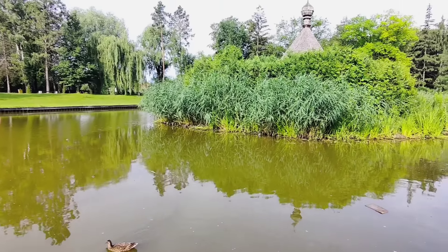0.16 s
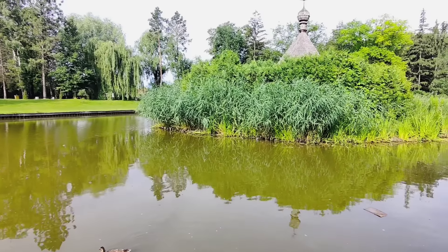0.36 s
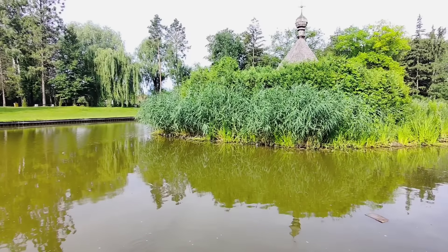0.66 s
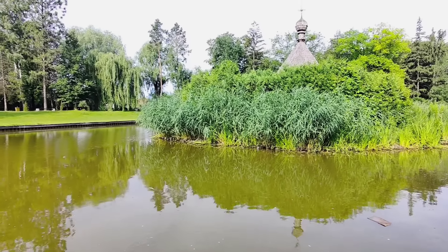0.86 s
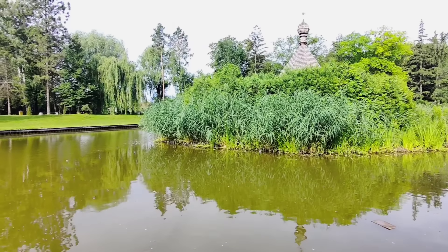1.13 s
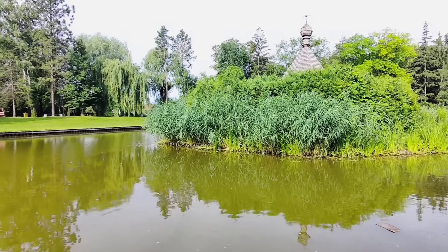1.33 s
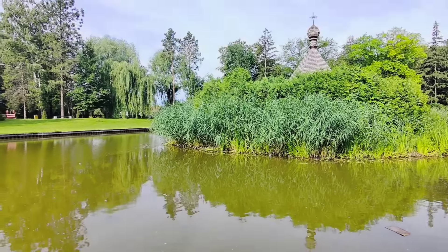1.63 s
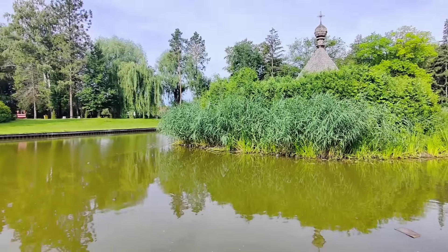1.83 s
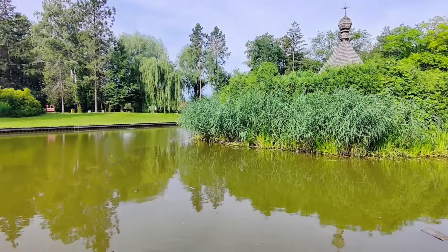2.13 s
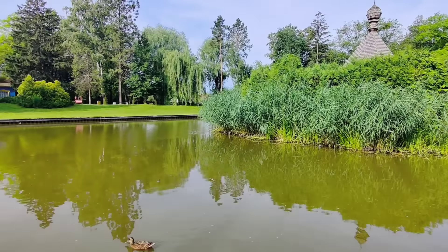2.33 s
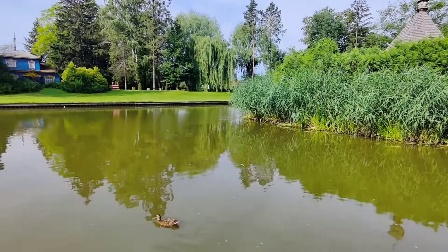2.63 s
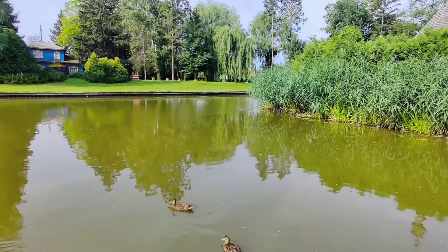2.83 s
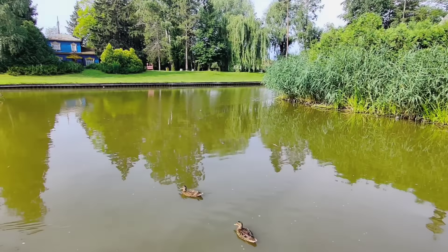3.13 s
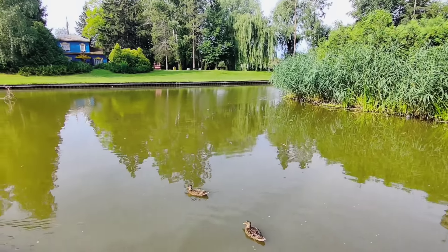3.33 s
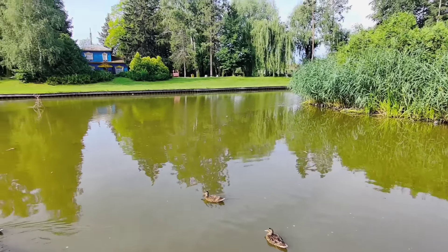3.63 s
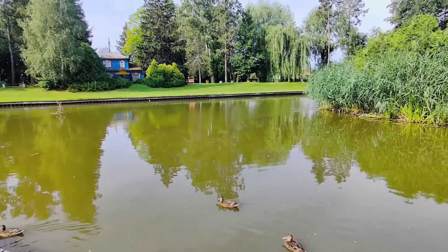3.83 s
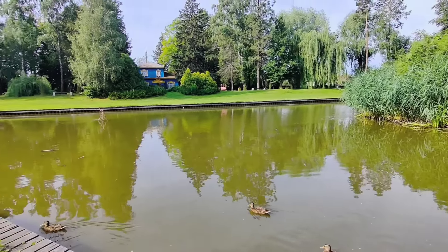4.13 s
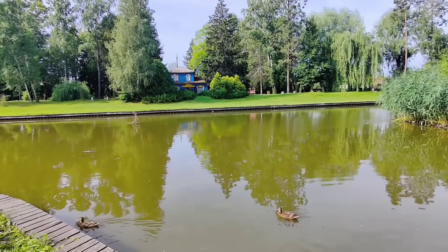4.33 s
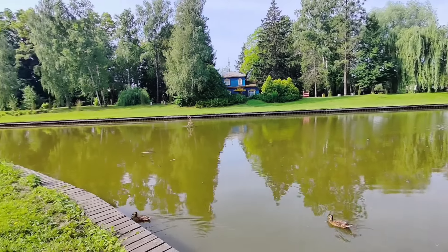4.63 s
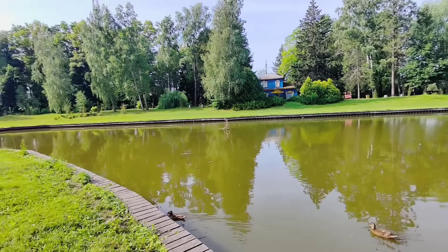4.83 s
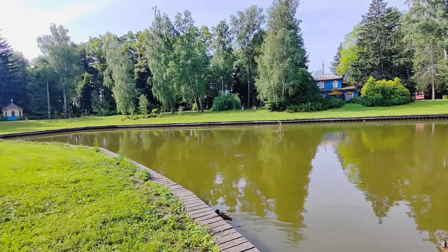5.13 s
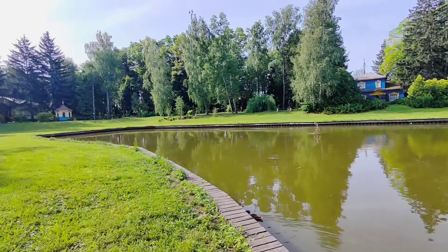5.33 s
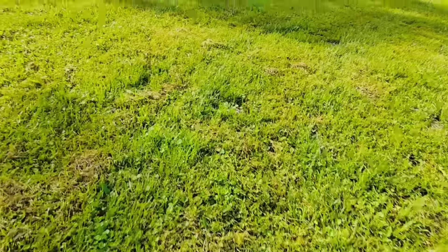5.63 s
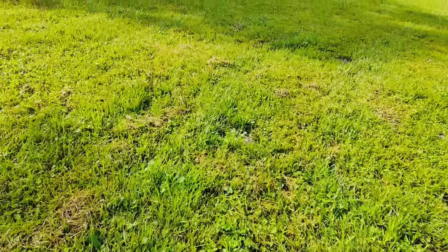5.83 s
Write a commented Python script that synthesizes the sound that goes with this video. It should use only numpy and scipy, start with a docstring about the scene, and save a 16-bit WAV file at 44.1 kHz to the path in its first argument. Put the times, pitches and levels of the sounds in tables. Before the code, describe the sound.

Low wind rumbles on the microphone by a calm pond, with steady cricket chirps, faint birds and small handling ticks.

```python
"""Wind rumbles on the ports of a small hand-held microphone pair beside a calm park pond.
A far machine hums, and noise bands make distant traffic and hissing leaves. Crickets chirp on the right,
each wing stroke a sagging tone; near the end one is suddenly close. Small birds whistle and chip, echoed
by the trees, and a duck quacks once. Grass swishes, and the grip ticks, knocks and bumps now and then."""
import sys
import numpy as np
from scipy import signal
from scipy.fft import rfft, irfft, next_fast_len
from scipy.io import wavfile

SR = 44100
rng = np.random.default_rng(int(sys.argv[2]) if len(sys.argv) > 2 else 0)


def store_pcm(level_fs):
    """Save levels as 16-bit WAV."""
    pcm = np.round(np.clip(level_fs, -1, 1) * 32767).astype(np.int16)
    wavfile.write(sys.argv[1], SR, np.atleast_2d(pcm).T)


N = 263012
TIME = np.arange(N) / SR


def from_db(db):
    """Decibels to gain."""
    return 10 ** (np.asarray(db) / 20)

def rms_one(x):
    """Scale to unit rms."""
    return x / np.sqrt(np.mean(x ** 2) + 1e-20)

def in_time(rows):
    """Turn breakpoint rows into one automation curve per column."""
    time_s, *columns = np.transpose(rows)
    return [np.interp(TIME, time_s, column) for column in columns]

def at_hz(points, hz):
    """Read an EQ curve on a log-frequency axis."""
    freq_hz, gain_db = np.transpose(points)
    return np.interp(np.log(hz), np.log(freq_hz), gain_db)

def phase_of(hz):
    """Running phase of a moving pitch."""
    return 2 * np.pi * np.cumsum(hz) / SR

def panned(x, pan_db):
    """Mono to stereo; pan_db is always left minus right."""
    return np.array([x * from_db(pan_db / 2), x * from_db(-pan_db / 2)])

def drift(rate_hz):
    """Smooth random modulation with a spread of 1."""
    hop, settle = 40, 2000
    pole = np.exp(-2 * np.pi * rate_hz * hop / SR)
    noise = rng.standard_normal(N // hop + settle + 2)
    slow = signal.lfilter([1], [1, -2 * pole, pole * pole], noise)[settle:]
    return np.interp(np.arange(N) / hop, np.arange(len(slow)), rms_one(slow))

def band(x, low_hz, high_hz):
    """Gentle band-pass."""
    return signal.sosfilt(signal.butter(2, [low_hz, high_hz], "band", fs=SR, output="sos"), x)

def steep_band(x, low_hz, high_hz):
    """Band-pass twice for steeper skirts."""
    return band(band(x, low_hz, high_hz), low_hz, high_hz)

def coloured(spectrum):
    """Stereo noise through an EQ curve, at unit rms."""
    size = next_fast_len(N)
    hz = np.maximum(np.fft.rfftfreq(size, 1 / SR), 1)
    white = rfft(rng.standard_normal((2, N)), size)
    return rms_one(irfft(white * from_db(at_hz(spectrum, hz)), size)[:, :N])

def placed(start_s, piece):
    """A stereo track holding one piece; what overhangs either end is trimmed."""
    out, i = np.zeros((2, N)), int(start_s * SR)
    piece = piece[:, max(-i, 0):N - i]
    out[:, max(i, 0):max(i, 0) + piece.shape[1]] = piece
    return out


# Gust automation: time_s, rumble_db, buffet_relative_db, flutter_relative_db, pan_db
GUSTS = [(0.0, -25.5, -23, -18, -9), (0.06, -29, -8, -26, 7), (0.18, -25.5, -4.5, -22.5, 1),
         (0.66, -39, -9.5, -29, 12), (0.75, -26.5, -7, -14.5, 13), (0.8, -35.5, -41, -52, 9.5),
         (0.94, -33, -6, -16, -11.5), (1.03, -35, -7, -26, 4.5), (1.3, -40, -14, -34, 0),
         (1.5, -35, -12.5, -28, 7), (1.8, -43.5, -11, -27, 0.5), (2.0, -48, -5.5, -28, 3.5),
         (2.2, -53.5, -10, -21, 3), (2.54, -55, -13, -23, -2.5), (3.07, -39.5, -29, -30, 21),
         (3.27, -46, -16, -21, 5.5), (3.7, -45, -17.5, -26, 4), (4.05, -41, -19, -31, 9),
         (4.38, -39, -16, -39, 7.5), (4.6, -39.5, -29, -39, 13), (4.76, -39.5, -36, -31, -1.5),
         (4.8, -52.5, 0, -17, 0), (5.06, -42.5, -41, -32, 9.5), (5.46, -35, -27, -41, -4),
         (5.68, -48, -7.5, -17.5, -1), (5.79, -39.5, 1, -6, -21), (5.93, -33, -4, -25, -18),
         (5.96, -45.5, 14, 14.5, -14)]
# Rumble EQ: freq_hz, gain_db
RUMBLE_EQ = [(7.1, -44), (12, 6), (33, 5.5), (45, 0), (60, -2.5), (78, -52), (130, -120)]

def wind(lumps_db=4, lumps_hz=14):
    """Wind hits each port with its own lumpy rumble, with buffeting and flutter on top."""
    rumble_db, buffet_db, flutter_db, pan_db = in_time(GUSTS)
    lumps = np.array([from_db(lumps_db * drift(lumps_hz)) for side in "LR"])
    rumble = rms_one(coloured(RUMBLE_EQ) * lumps)
    buffet = rms_one(steep_band(rng.standard_normal((2, N)), 44.8, 104.3) * lumps)
    flutter = rms_one(steep_band(rng.standard_normal((2, N)), 81, 179) * lumps)
    blend = rumble + from_db(buffet_db) * buffet + from_db(flutter_db) * flutter
    return blend * panned(from_db(rumble_db), pan_db)


# Machine drone: time_s, pitch_hz, level_db
MACHINE_HUM = [(0, 101.3, -57.5), (2, 100.1, -66.5), (3, 100.2, -60), (4.5, 100.8, -57.5),
               (5.96, 99.6, -62.5)]

def machine_hum():
    """A far machine holds one low tone that wavers in pitch and level."""
    pitch_hz, level_db = in_time(MACHINE_HUM)
    tone = np.sqrt(2) * np.sin(phase_of(pitch_hz + 4.5 * drift(5.7)))
    return panned(tone * from_db(level_db + 3 * drift(8)), 0.13)


# Stereo width of the ambience: freq_hz, side_minus_mid_db
BED_WIDTH = [(60, -35), (180, -23), (550, -5), (1650, 0.5), (4970, 1), (15000, -5)]
# Lean of the ambience: freq_hz, pan_db
BED_PAN = [(60, -11.5), (180, 1), (550, 0.5), (1650, -4), (4970, -5), (15000, -1)]

def ambience_bed(spectrum, flicker_db):
    """Seven overlapping noise bands flicker partly together, each with its own width and pan."""
    size = next_fast_len(N)
    noise = rfft(coloured(spectrum), size)
    out, shared_flicker = 0, drift(9.5)
    centres_hz = np.geomspace(spectrum[0][0], spectrum[-1][0], 7)
    bin_hz = np.fft.rfftfreq(size, 1 / SR) + 1
    band_position = np.interp(np.log(bin_hz), np.log(centres_hz), np.arange(7))
    for k, hz in enumerate(centres_hz):
        crossfade = np.clip(1 - np.abs(band_position - k), 0, 1)
        flicker = from_db(flicker_db * (shared_flicker + drift(11.4)))
        mid, side = irfft(noise * crossfade, size)[:, :N] * flicker
        side *= from_db(at_hz(BED_WIDTH, hz))
        out += np.array([mid + side, mid - side]) * panned(np.ones(1), at_hz(BED_PAN, hz))
    return out / np.std(out.mean(0))


# Ambience faders: time_s, traffic_db, leaves_db, hiss_db
AIR_FADERS = [(0, -60, -64.5, -72), (.4, -60, -66, -76.5), (.8, -59.5, -64.5, -74), (1.25, -63, -65.5, -73),
              (1.5, -58, -64.5, -74.5), (2.1, -59.5, -66.5, -75.5), (2.28, -66.5, -68.5, -78.5),
              (2.72, -66, -71, -81), (3.0, -57, -67, -72.5), (3.4, -64, -69, -75.5),
              (4.0, -57.5, -66.5, -75), (4.5, -59, -63.5, -70.5), (4.85, -62, -67.5, -77),
              (5.45, -59.5, -64, -73), (5.7, -61, -66.5, -73.5), (5.96, -63.5, -70, -77)]
# EQ of each layer: freq_hz, gain_db
TRAFFIC_EQ = [(59, -27.5), (100, 0), (146, -10.5), (282, -16), (428, -13.5), (524, -16.5), (616, -17),
              (1350, -24.5), (2500, -24), (3250, -32), (5500, -120)]
LEAVES_EQ = [(1000, -54), (1400, -12), (2200, -8), (3300, -2), (4400, 0), (5000, -6.5), (5900, -3),
             (6800, -9), (8000, -19), (9500, -92)]
HISS_EQ = [(5000, -34), (7500, -2), (10000, 0), (14200, -1.5), (15200, -3), (15800, -21)]

def park_air():
    """Far traffic below, leaves above, a fine hiss on top."""
    traffic_db, leaves_db, hiss_db = in_time(AIR_FADERS)
    traffic = from_db(traffic_db) * ambience_bed(TRAFFIC_EQ, flicker_db=.9)
    leaves = from_db(leaves_db) * ambience_bed(LEAVES_EQ, flicker_db=.5)
    hiss = coloured(HISS_EQ) * from_db(hiss_db + 1.3 * drift(8))
    return traffic + leaves + hiss


# Far cricket fader: time_s, level_db
CHORUS_FADER = [(0, -78), (.4, -72), (.9, -74), (1.6, -66.5), (2.2, -78), (2.5, -79), (2.8, -68),
                (3.2, -70.5), (3.45, -71.5), (3.75, -69), (4.3, -71), (4.8, -74), (5.23, -71), (5.7, -81),
                (5.96, -68)]

def cricket_chorus():
    """Far crickets blur into one narrow, throbbing band."""
    blur = steep_band(rng.standard_normal(N), 4240, 4570)
    throb = 1 + .19 * np.sin(phase_of(29 + 2.62 * drift(2.4)))
    chorus = rms_one(blur * throb * from_db(3.5 * drift(3.8)))
    return panned(chorus * from_db(in_time(CHORUS_FADER)[0]), -6.5)


# Cricket chirps, about three a second: last_stroke_s, level_db, pitch_hz, pan_db
CRICKET_CHIRPS = [(.044, -57.5, 4400, -13), (.213, -76, 4420, -10), (0.367, -57, 4450, -12),
                  (.703, -59.5, 4430, -11), (1.035, -58, 4430, -12), (1.351, -57, 4430, -9),
                  (1.668, -64, 4420, -15), (2.002, -59, 4430, -9), (2.323, -64.5, 4430, -9),
                  (2.62, -72, 4410, -8), (3.072, -62, 4450, -10), (3.33, -67, 4450, -16),
                  (3.731, -63, 4360, -15), (4.035, -71, 4480, -10), (4.408, -62, 4440, -8),
                  (4.719, -60, 4440, -16), (5.001, -78, 4420, -4), (5.683, -63.5, 4420, -11),
                  (5.872, -36.5, 4444, -6)]
# The four wing strokes of a chirp: offset_s, length_s, relative_db, flat_by_hz
WING_STROKES = [(-.09, .015, -8, 66), (-.066, .021, -2.5, 73), (-.035, 0.024, -0.5, 50),
                (-.001, 0.028, 0, -5)]

def crickets(scatter_db=1.5):
    """Each wing stroke is a near-pure tone that sags in pitch as the wing's file slows."""
    out = np.zeros((2, N))
    for last_stroke_s, level_db, pitch_hz, pan_db in CRICKET_CHIRPS:
        for offset_s, length_s, relative_db, flat_by_hz in WING_STROKES:
            progress = np.linspace(0, 1, int(length_s * SR))
            phase = phase_of((pitch_hz - flat_by_hz) * (1.02 - .09 * progress ** 3))
            tone = np.sin(phase) + from_db(-34) * np.sin(2 * phase)
            envelope = np.sin(np.pi * progress ** 1.3) ** .7
            gain = from_db(level_db + relative_db + scatter_db * rng.standard_normal())
            out += placed(last_stroke_s + offset_s, panned(tone * envelope * gain, pan_db))
    return out


def whistled_note(times_s, pitches_hz, levels_db, pan_db, waver):
    """A bird's pure tone follows breakpoints, trembling in pitch and level."""
    start_s, end_s = times_s[0], times_s[-1]
    t = np.arange(start_s, end_s, 1 / SR)
    tremble = waver[int(start_s * SR):][:len(t)]
    fade = np.clip(np.minimum(t - start_s, end_s - t) / .008, 0, 1)
    tone = np.sqrt(2) * np.sin(phase_of(np.interp(t, times_s, pitches_hz) * (1 + .004 * tremble)))
    gain = from_db(np.interp(t, times_s, levels_db) + 1.5 * tremble[::-1])
    return placed(start_s, panned(tone * fade * gain, pan_db))


# High whistles: shape_name, start_s, length_s, start_hz, level_db, pan_db, send_db
HIGH_WHISTLES = [("sag", .09, 0.152, 6040, -56.5, -7.5, 2), ("sag", 5.59, 0.086, 5990, -65.5, 2.5, 4)]
# Whistle contours by name: length_fraction, pitch_ratio, relative_db
WHISTLE_SHAPES = {"sag": [(0, 1.0, -9), (.12, .999, 1.5), (.23, .995, .5), (.265, .958, -2.5),
                  (.56, .936, .5), (.89, .931, -1.5), (1, .929, -11)]}

def bird_whistles(waver):
    """Thin whistles that sag in pitch; yields each note with its echo send."""
    for shape_name, start_s, length_s, start_hz, level_db, pan_db, send_db in HIGH_WHISTLES:
        fraction, ratio, relative_db = np.transpose(WHISTLE_SHAPES[shape_name])
        times_s = start_s + fraction * length_s
        yield whistled_note(times_s, start_hz * ratio, level_db + relative_db, pan_db, waver), send_db


# Short bird chirps: start_s, length_s, start_hz, end_hz, level_db, pan_db
SLIDING_CHIRPS = [(0.239, 0.019, 3600, 3700, -68, -11), (.3, .047, 5050, 4850, -68, -2),
                  (0.534, 0.042, 4340, 4334, -49.5, -11), (1.951, 0.018, 2290, 2350, -62.5, -12),
                  (2.24, .028, 3620, 3920, -66, -5), (2.592, 0.016, 5650, 5570, -57, -1),
                  (3.216, .07, 7230, 5970, -73, -5), (3.928, 0.063, 7400, 6340, -74, -12),
                  (4.067, .04, 7300, 6270, -73, -11), (4.95, .07, 6500, 5570, -78, -5),
                  (3.87, 0.03, 2830, 2840, -69, -8), (4.307, 0.035, 2740, 2740, -67, -11),
                  (4.385, .02, 2740, 2670, -67, -9), (4.405, 0.023, 2760, 2660, -66, -9),
                  (4.438, 0.017, 2740, 2640, -77, -5), (4.434, 0.039, 2520, 2310, -63, -9),
                  (5.097, 0.038, 3470, 3390, -60, -8), (5.18, 0.052, 4414, 4400, -58, -4),
                  (5.355, 0.07, 3440, 3460, -69, 1), (5.453, 0.057, 4326, 4330, -56.5, -7),
                  (0.578, 0.043, 4390, 4300, -65, -14), (5.248, 0.129, 4460, 4410, -67, -6),
                  (5.509, 0.11, 4315, 4300, -68, -7)]

def bird_chirps(waver, waver_hz=20, waver_db=2.5):
    """Each chirp is a brief, trembling slide between two pitches."""
    out = np.zeros((2, N))
    for start_s, length_s, start_hz, end_hz, level_db, pan_db in SLIDING_CHIRPS:
        progress = np.linspace(0, 1, int(length_s * SR))
        tremble = waver[int(start_s * SR):][:len(progress)]
        pitch_hz = start_hz + (end_hz - start_hz) * progress + waver_hz * tremble
        tone = np.sqrt(2) * np.sin(phase_of(pitch_hz))
        envelope = np.sin(np.pi * progress ** 1.1) ** .54
        gain = from_db(level_db + waver_db * tremble[::-1])
        out += placed(start_s, panned(tone * envelope * gain, pan_db))
    return out


# Soft handling knocks: start_s, level_db, pitch_hz, pan_db
GRIP_KNOCKS = [(0.245, -52.5, 286, 8), (1.757, -47, 425, -3), (2.905, -48.5, 370, 2),
               (3.988, -49.5, 375.3, 5), (4.332, -54, 262, 6), (4.754, -50, 440, 2), (4.898, -56, 437, -1),
               (5.021, -57, 460, 1.5), (5.702, -42, 485, 6)]

def grip_knocks():
    """A knock on the grip is a damped ring with a puff of midrange noise."""
    out, t = np.zeros((2, N)), TIME[:SR // 20]
    for start_s, level_db, pitch_hz, pan_db in GRIP_KNOCKS:
        ring = np.sin(2 * np.pi * pitch_hz * t) * np.exp(-t / .0056)
        puff = .99 * band(rng.standard_normal(len(t)), 290, 1800) * np.exp(-t / .0088)
        out += placed(start_s, panned((ring + puff) * from_db(level_db), pan_db))
    return out


# A run of falling chirps: start_s, length_s, start_hz, level_db, pan_db
FALLING_CHIRPS = [(.278, .068, 4350, -63, 1), (.39, .07, 4350, -62, 2), (.503, .06, 4350, -62.5, 1),
                  (.607, .06, 4350, -65, 2), (.73, .06, 3800, -63.5, 1)]
# Their pitch contour: length_fraction, drop_fraction
FALL_CONTOUR = [(0, 0), (.12, .08), (.36, .57), (.72, .74), (1, 1)]

def bird_falls(waver, end_hz=2950, waver_db=2.5):
    """A bird's chirps drop in two steps to the same pitch, fading as they fall."""
    out = np.zeros((2, N))
    for start_s, length_s, start_hz, level_db, pan_db in FALLING_CHIRPS:
        progress = np.linspace(0, 1, int(length_s * SR))
        tremble = waver[int(start_s * SR):][:len(progress)]
        drop = np.interp(progress, *np.transpose(FALL_CONTOUR))
        tone = np.sqrt(2) * np.sin(phase_of(start_hz + (end_hz - start_hz) * drop))
        envelope = np.sin(np.pi * progress ** .6) ** .4
        gain = from_db(level_db + 1.5 - 3 * progress + waver_db * tremble)
        out += placed(start_s, panned(tone * envelope * gain, pan_db))
    return out


# Long whistles, one breakpoint list each: time_s, pitch_hz, level_db
GLIDE_CONTOURS = [
    [(.285, 2980, -75), (.297, 3050, -66), (.337, 3190, -63), (.43, 3340, -68), (.45, 3470, -72),
     (.473, 3530, -62), (.503, 3560, -65), (.52, 3500, -72), (.573, 3610, -69), (.61, 3650, -73)],
    [(2.28, 2950, -78), (2.294, 3050, -68), (2.334, 3210, -63), (2.375, 3270, -66), (2.4, 3290, -74),
     (2.44, 3350, -69), (2.49, 3420, -80), (2.54, 3520, -69), (2.62, 3800, -70), (2.645, 3850, -80)],
    [(3.895, 3020, -70), (3.91, 3110, -65), (3.95, 3190, -64), (4.0, 3280, -65), (4.03, 3340, -76),
     (4.07, 3380, -67), (4.14, 3385, -68), (4.18, 3440, -76), (4.215, 3570, -66), (4.26, 3700, -68),
     (4.29, 3900, -68), (4.315, 3930, -72)],
    [(4.745, 3500, -74), (4.77, 3060, -68), (4.8, 2560, -67), (4.82, 2450, -65), (4.84, 2600, -69),
     (4.868, 3050, -65), (4.885, 2960, -72), (4.95, 2990, -80)],
    [(5.09, 3510, -70), (5.115, 3050, -70), (5.136, 2770, -61), (5.156, 2560, -66), (5.19, 2530, -64),
     (5.21, 2770, -61), (5.23, 3070, -68), (5.33, 3060, -78)],
]
# Mix of each glide: pan_db, send_db
GLIDE_MIX = [(-9, 1), (-6, -4), (-7, -2), (-8, 4), (-12, 5)]

def bird_glides(waver):
    """Three whistles climb and two dip; yields each note with its echo send."""
    for contour, (pan_db, send_db) in zip(GLIDE_CONTOURS, GLIDE_MIX):
        yield whistled_note(*np.transpose(contour), pan_db, waver), send_db


# Far song phrases: start_s, end_s, low_hz, high_hz, level_db, pan_db
FAR_PHRASES = [(0.619, 1.1, 2780, 3860, -66, -7), (0.997, 1.544, 4370, 5900, -64.5, 1)]

def far_birdsong():
    """The trees blur far song into soft swells of hiss."""
    out = np.zeros((2, N))
    for start_s, end_s, low_hz, high_hz, level_db, pan_db in FAR_PHRASES:
        t = TIME[:int((end_s - start_s) * SR)]
        hiss = rms_one(steep_band(rng.standard_normal(len(t)), low_hz, high_hz))
        swell = np.sin(np.pi * t / t[-1]) ** .5
        out += placed(start_s, panned(hiss * swell * from_db(level_db), pan_db))
    return out


# Low handling thumps: start_s, left_gain, right_gain, width_s, rebound_ratio, lowpass_hz
HAND_BUMPS = [(0.734, 0.18, 0.014, 0.00448, 0.5, 338), (1.1884, -0.041, 0.21, 0.00298, 0, 1510)]

def hand_bumps():
    """The hand bumps the microphone body: one dull push, with any rebound dying fast."""
    out, t = np.zeros((2, N)), TIME[:SR // 20]
    for start_s, left_gain, right_gain, width_s, rebound_ratio, lowpass_hz in HAND_BUMPS:
        rebound = rebound_ratio * np.exp(-(t - width_s) / (2.5 * width_s))
        push = np.sin(np.pi * t / width_s) * np.where(t < width_s, 1, rebound)
        thump = signal.sosfilt(signal.butter(2, lowpass_hz, fs=SR, output="sos"), push)
        out += placed(start_s, np.outer([left_gain, right_gain], thump))
    return out


# Dry handling ticks: start_s, top_db, pan_db, body_relative_db, low_relative_db
GRIP_TICKS = [(1.1869, -44.5, -8, 3.5, 11.5), (1.6025, -46, -9, -13, 2), (2.587, -48, -7, 3, -13),
              (3.2994, -50, -1, -7, -8), (3.511, -48, 1, 3, -12), (3.554, -37.5, -2, -28, -20),
              (3.871, -51, 1, -8, 1), (3.981, -49, 0, 4, -6), (4.006, -46, -5, -6, -4),
              (4.339, -43.5, -6, -1.5, -2), (4.5425, -38.5, -1, 0, -10), (5.247, -39, -2, -20, -17),
              (5.491, -45, 0, 0, -12), (5.695, -40, -7, 10, -1), (5.7405, -43, 3, -8, -25),
              (5.7465, -36.5, 8, -20, -30), (5.756, -35.5, 4, 1, -26), (5.9133, -43, 0, 3, -20),
              (5.9153, -36, 7.5, -7, -20)]

def grip_ticks(decay_s=.0005):
    """The grip ticks: a tiny noise burst, balanced in three bands."""
    out, t = np.zeros((2, N)), TIME[:SR // 20]
    for start_s, top_db, pan_db, body_db, low_db in GRIP_TICKS:
        crack = rng.standard_normal((2, len(t))) * np.exp(-t / decay_s)
        parts = band(crack, 7000, 18000), band(crack, 3800, 7000), steep_band(crack, 1300, 2700)
        gains = from_db([0, body_db, low_db])
        tick = sum(gain * part / np.abs(part).max() for gain, part in zip(gains, parts))
        out += placed(start_s, tick * panned(from_db([top_db]), pan_db))
    return out


# Swishes of grass and leaves: start_s, peak_s, end_s, level_db, tilt_db_per_octave, pan_db
GRASS_SWISHES = [(1.786, 1.814, 1.87, -56.5, -2, 4), (2.759, 2.829, 2.995, -55.5, 5.5, -0.5),
                 (4.448, 4.515, 4.67, -59.5, 7, 1.5), (5.372, 5.515, 5.56, -54.5, 4.5, -2),
                 (5.728, 5.735, 5.97, -61.5, 7, 3)]
# Swish EQ before the tilt: freq_hz, gain_db
SWISH_EQ = [(180, -47), (300, -26), (480, 3), (900, 4), (1300, 1), (4200, -17.5), (8000, -28.5),
            (14800, -35.5), (15800, -57)]

def grass():
    """Each swish is grainy noise that swells and fades."""
    out = np.zeros((2, N))
    for start_s, peak_s, end_s, level_db, tilt, pan_db in GRASS_SWISHES:
        rustle = coloured([(hz, db + tilt * np.log2(hz / 2000)) for hz, db in SWISH_EQ])
        swell = np.interp(TIME, [start_s, peak_s, end_s], [0, 1, 0]) ** .65
        grain_db = 2.5 * drift(70)
        out += rustle * panned(swell * from_db(level_db + grain_db), pan_db)
    return out


# One soft quack: start_s, length_s, pitch_hz, level_db, pan_db
DUCK_QUACK = (1.8, .046, 405, -56, 4)
# Its partials: harmonic_number, relative_db
QUACK_PARTIALS = [(1, 0), (2, -1), (3, -3), (4, -9)]

def duck():
    """A short muffled quack: a slightly rough stack of partials bending down."""
    start_s, length_s, pitch_hz, level_db, pan_db = DUCK_QUACK
    progress = np.linspace(0, 1, int(length_s * SR))
    roughness = .02 * drift(80)[:len(progress)]
    phase = phase_of(pitch_hz * (1.03 - .06 * progress + roughness))
    voice = sum(from_db(level_db + db) * np.sin(k * phase) for k, db in QUACK_PARTIALS)
    return placed(start_s, panned(voice * np.sin(np.pi * progress) ** .5, pan_db))


# A quick run of chips: start_s, level_db, pan_db
SPARROW_CHIPS = [(2.25, -64, 1), (2.336, -67, 6), (2.42, -62, 1), (2.505, -59, 1), (2.596, -61, 5),
                 (2.687, -67, 4)]

def sparrow():
    """A far sparrow's hoarse chips are short puffs of narrow noise."""
    out, window = np.zeros((2, N)), np.hanning(SR // 45)
    for start_s, level_db, pan_db in SPARROW_CHIPS:
        rasp = rms_one(band(rng.standard_normal(len(window)), 4900, 5900)) * window
        out += placed(start_s, panned(rasp * from_db(level_db), pan_db))
    return out


def tree_echo(send, return_db=-4.5, decay_s=.1):
    """The trees scatter sound back as a short, darker tail."""
    tail = rng.standard_normal((2, SR // 2)) * np.exp(-TIME[:SR // 2] / decay_s)
    tail /= np.sqrt(np.sum(tail ** 2, axis=1, keepdims=True))
    return from_db(return_db) * signal.fftconvolve(band(send, 900, 4700), tail, axes=1)[:, :N]

def bird_bus(right_lag_s=.00005):
    """The songbirds and their echo, reaching the right port a little later."""
    waver = drift(60)
    direct = bird_chirps(waver) + bird_falls(waver) + far_birdsong() + sparrow()
    send = direct.copy()
    for note, send_db in [*bird_whistles(waver), *bird_glides(waver)]:
        direct += note
        send += note * from_db(send_db)
    left, right = direct + tree_echo(send)
    return np.array([left, np.interp(TIME - right_lag_s, TIME, right)])

def scene():
    """Ambience, handling and wildlife meet at the two ports."""
    ambience = wind() + machine_hum() + park_air() + grass()
    handling = grip_ticks() + grip_knocks() + hand_bumps()
    wildlife = crickets() + cricket_chorus() + bird_bus() + duck()
    return ambience + handling + wildlife

def record(dry, stopband_hz=16300):
    """A steep low-pass takes off the very top."""
    return signal.sosfilt(signal.cheby2(12, 70, stopband_hz, fs=SR, output="sos"), dry)


dry = scene()
out = record(dry)
store_pcm(out)
```